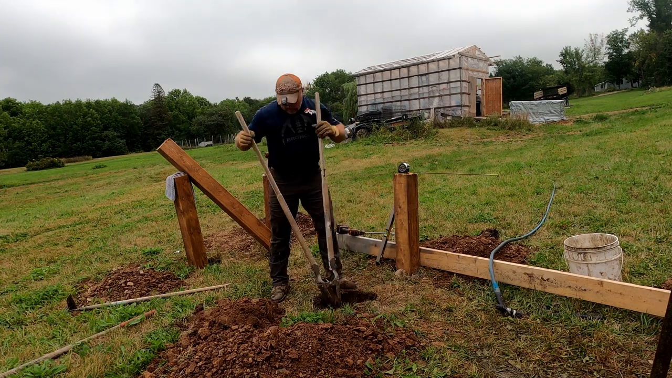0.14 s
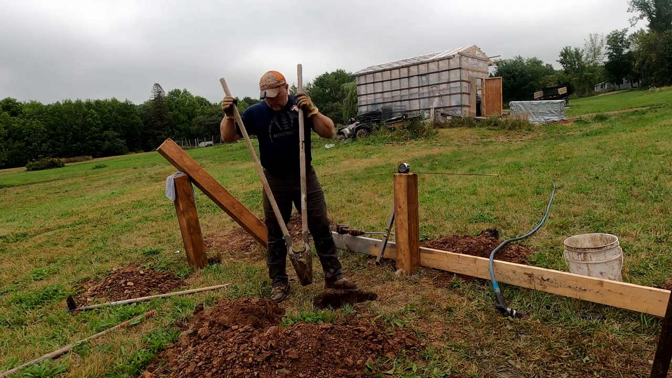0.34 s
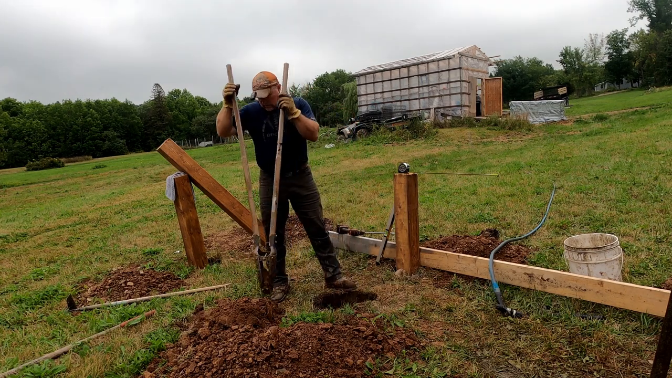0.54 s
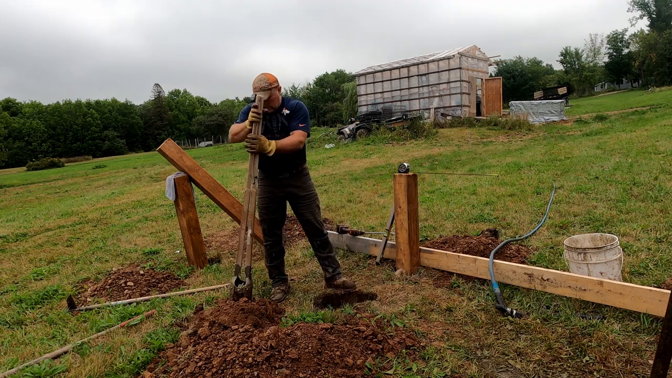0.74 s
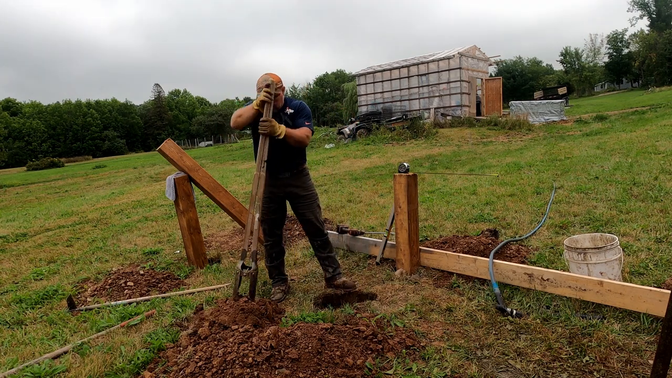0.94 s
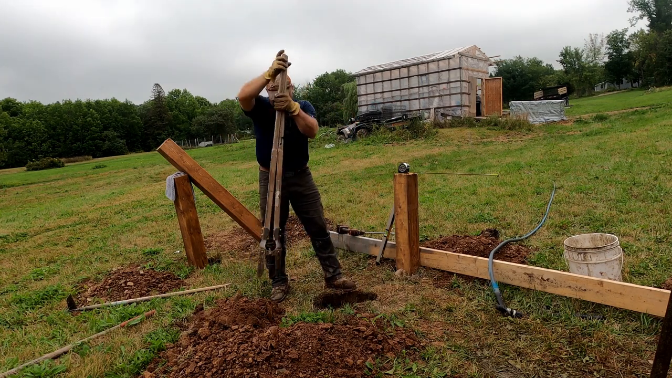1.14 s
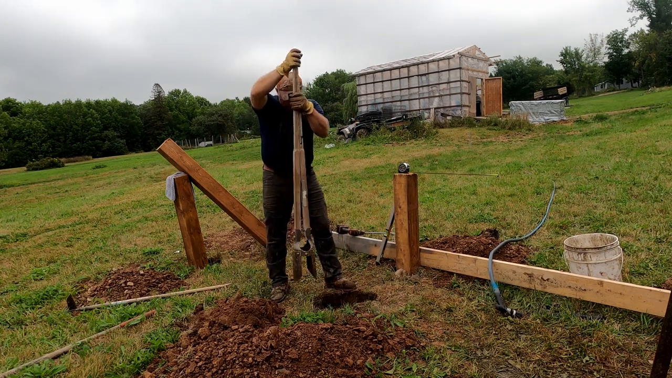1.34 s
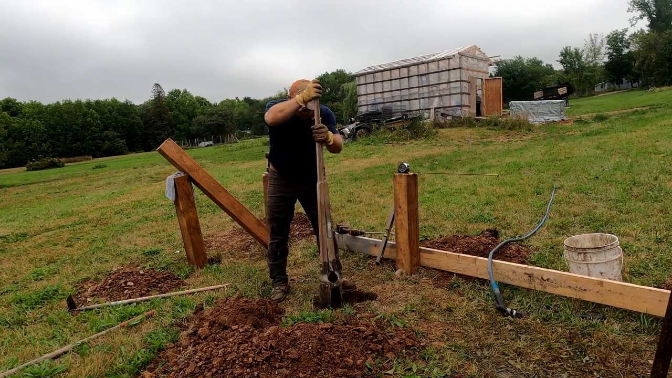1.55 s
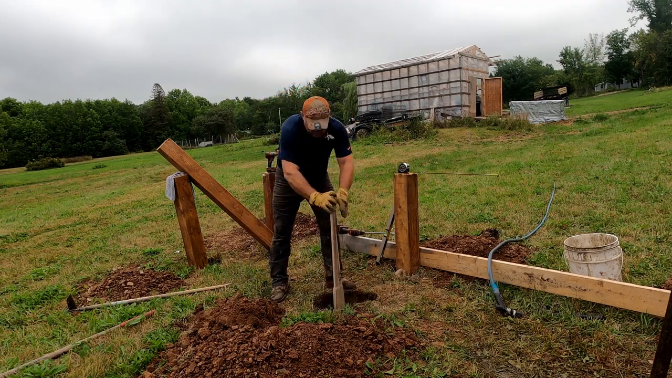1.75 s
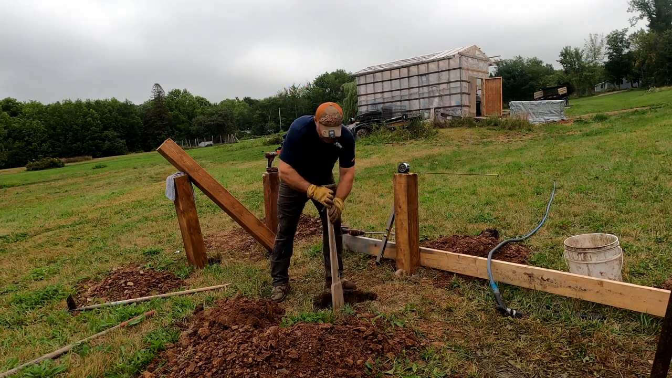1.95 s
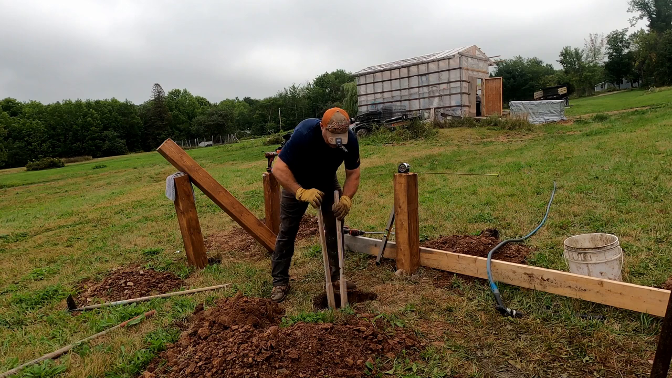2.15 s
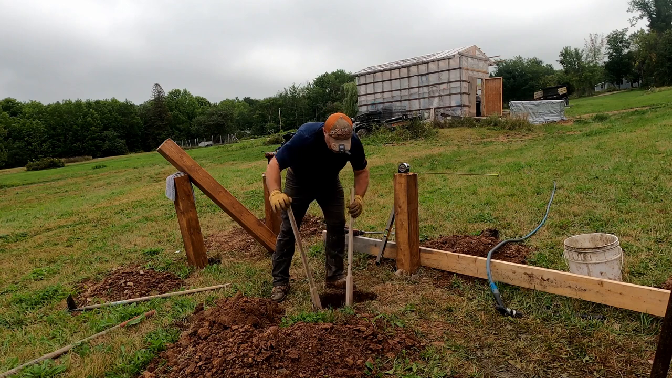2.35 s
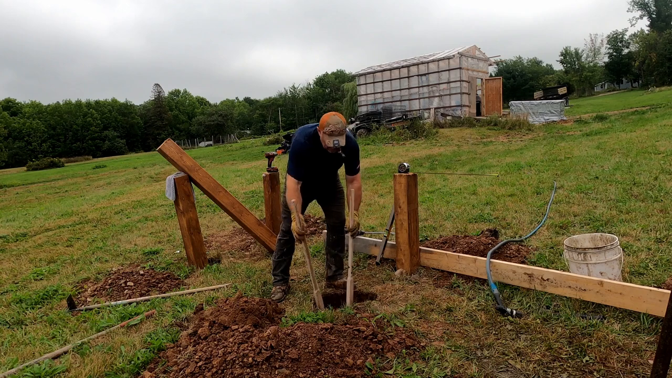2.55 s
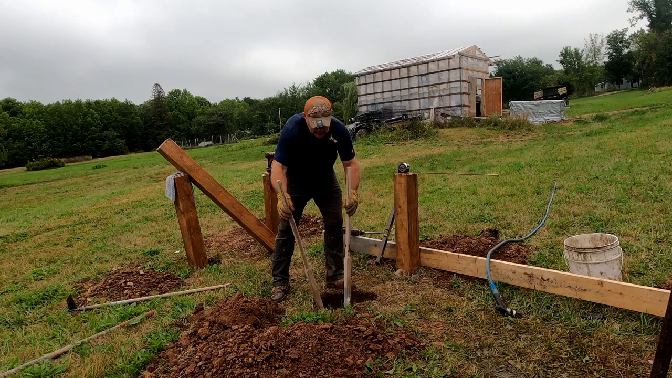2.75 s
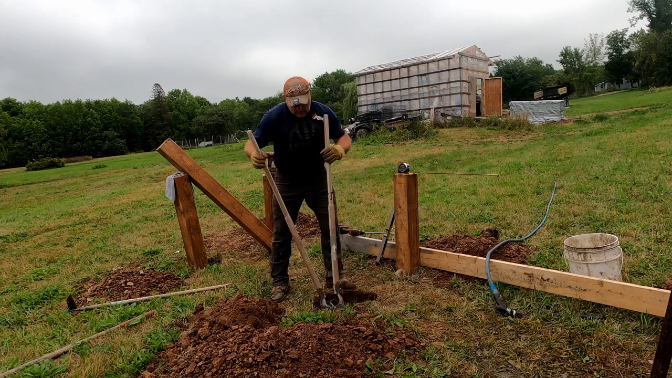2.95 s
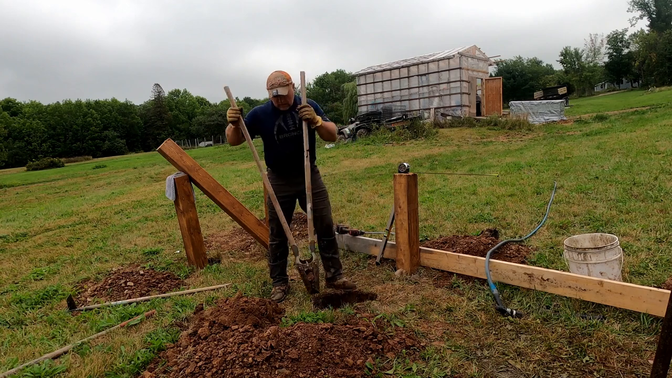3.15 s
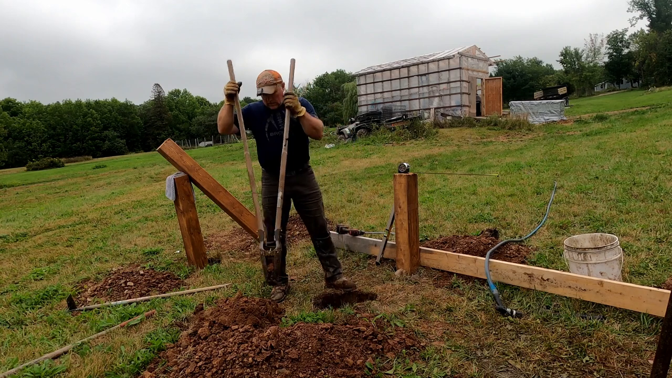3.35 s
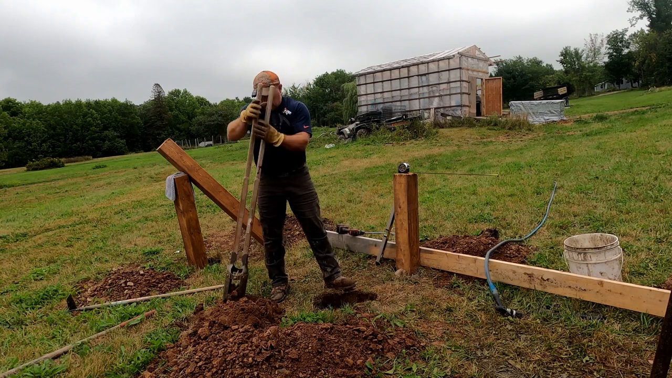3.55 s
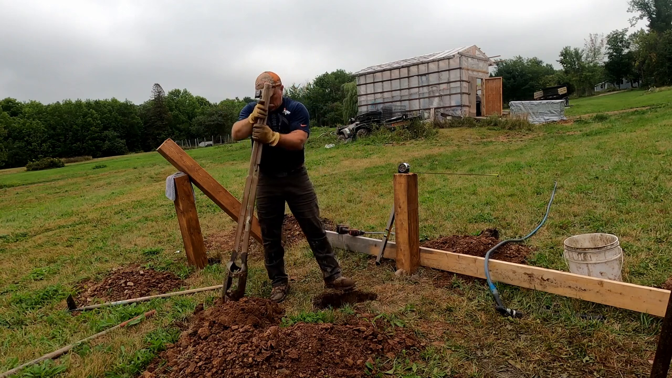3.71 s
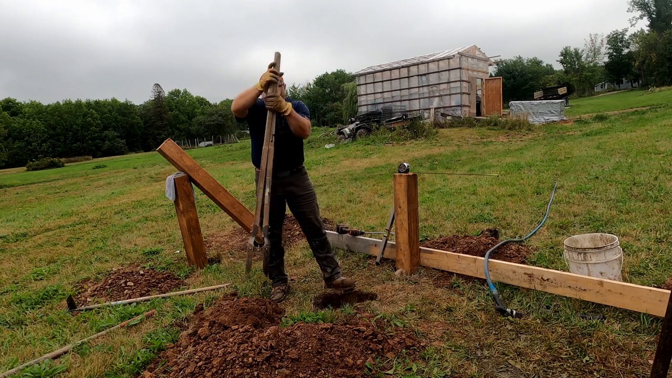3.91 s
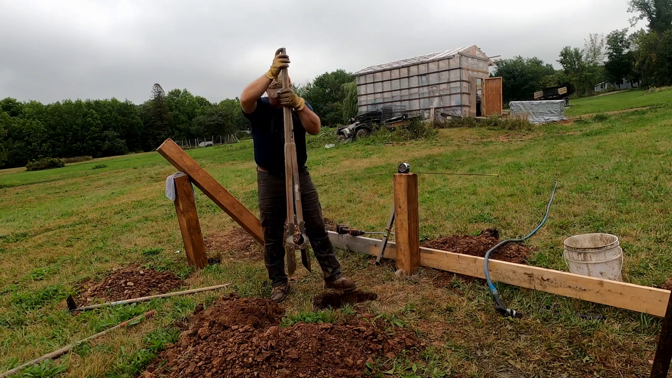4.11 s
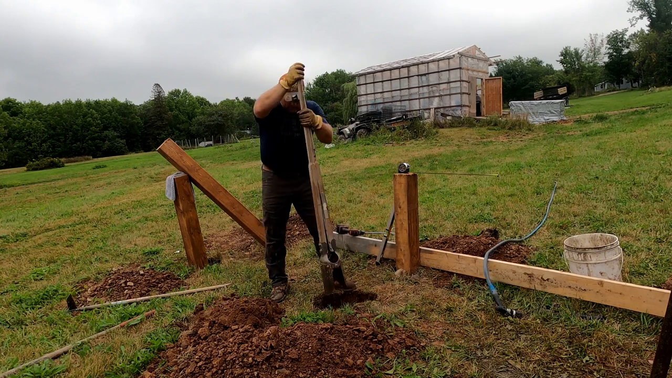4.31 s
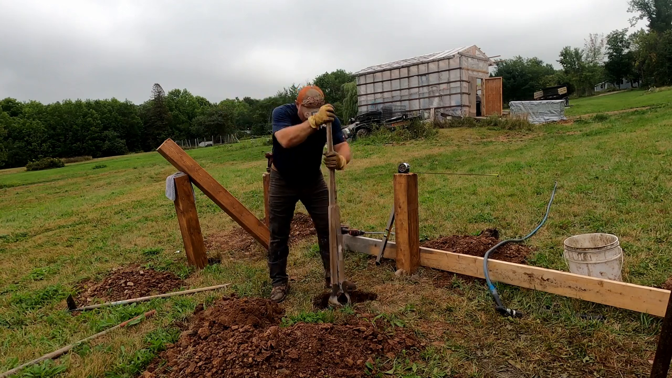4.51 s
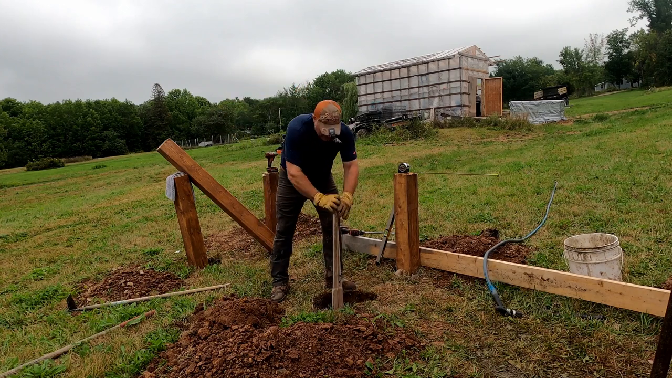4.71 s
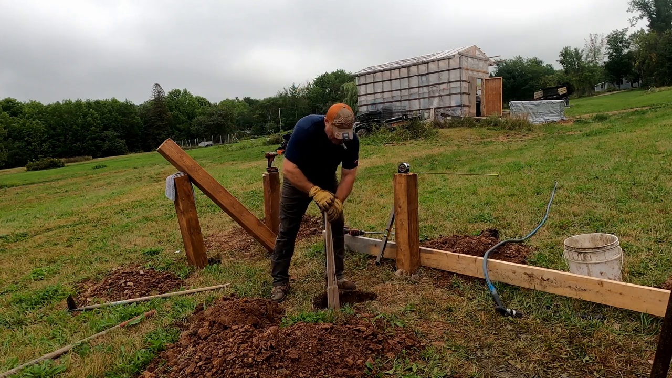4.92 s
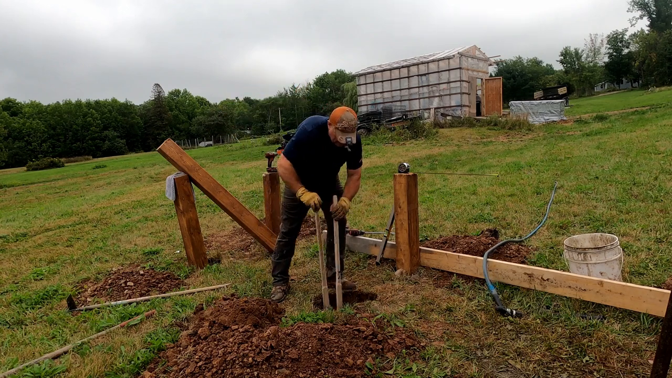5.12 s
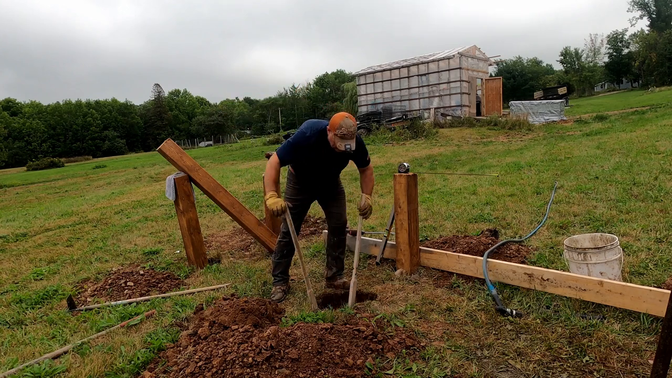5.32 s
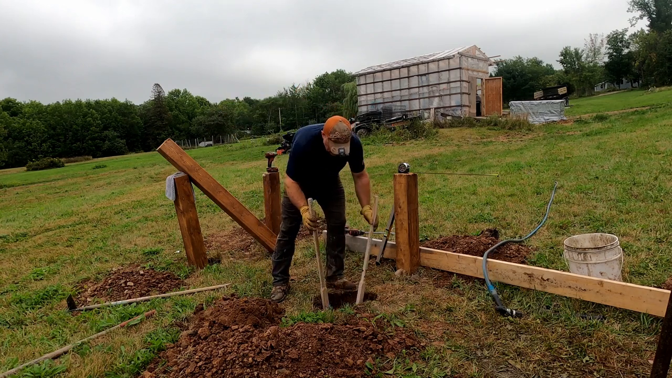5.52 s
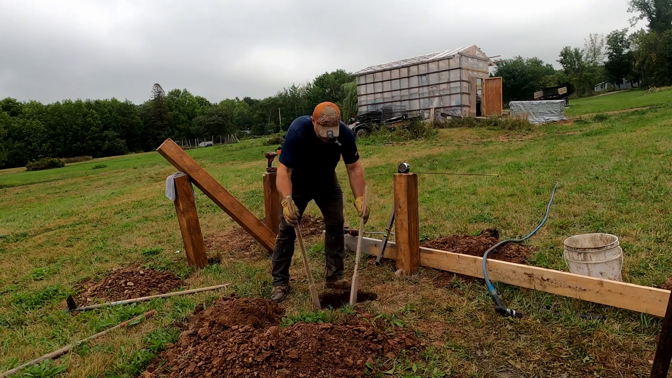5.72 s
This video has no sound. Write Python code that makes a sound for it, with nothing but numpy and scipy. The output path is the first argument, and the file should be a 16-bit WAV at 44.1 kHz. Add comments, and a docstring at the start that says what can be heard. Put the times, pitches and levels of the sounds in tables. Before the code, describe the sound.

Two rounds of digging with a post hole digger sound near the microphone outdoors. Each brings a soft gritty scrape, a loud metallic knock that shakes the load off, a trickle of crumbling earth, then a crunching, thudding stab into the ground. Wooden handles knock and creak lightly between blows, while quiet crickets and a low breeze carry on throughout.

```python
"""A meadow, where a clamshell digger works a post hole in stony clay. The blades scrape up the
wall, knock their load off, clack, ring, and plunge back with a crunch and a thud of the hole. The
handles knock and creak; loose soil trickles onto the heap. Crickets sing with wing strokes, mostly
on the left, over wind and far rumble. The hardest blows saturate."""
import sys
import numpy as np
from scipy import signal
from scipy.fft import rfft, irfft, next_fast_len
from scipy.io import wavfile
from scipy.ndimage import uniform_filter1d, map_coordinates

SR = 44100
rng = np.random.default_rng(int(sys.argv[2]) if len(sys.argv) > 2 else 0)


def wrap_up_sound(samples):
    """Save the sound to the file named by the first command line argument, as 16-bit audio."""
    columns = np.atleast_2d(samples).T
    # keep every value between -1 and 1, then stretch to whole-number steps
    tamed = np.clip(columns, -1, 1)
    steps = np.round(tamed * 32767).astype(np.int16)
    wavfile.write(sys.argv[1], SR, steps)


N = 254456

# Contacts with stone and clay: (time [s], level [dB], bass [rel dB], treble [rel dB], crush [ms])
CONTACTS = [(.397, -45, -22, -25, 11), (0.442, -43, -17, -27, 2.2), (.490, -56.5, -1, -31, 2.7),
            (.510, -49.5, -4.5, -38, 12), (.590, -41.5, 3, -37, 4.8), (0.804, -40.5, -13, -3.5, 18),
            (.862, -2.5, -21, -22, 2.2), (0.892, -13.5, -16, -23, 4.6), (0.92, -31, -4.5, -17, 9.1),
            (0.984, -34.5, -37, -30, 12), (1.05, -29.5, -19.5, -10, 5.7), (1.089, -18.5, -31, -4, 2),
            (1.593, -33, -24, -29, 14.4), (1.702, -32.5, -17, -9, 2), (1.714, -34.5, -25, -13, 5.6),
            (1.761, -39.5, -17.5, -17, 12.4), (1.848, -27.5, -19, -14, 5.5), (2.302, -51.5, 7.5, -9, 3.7),
            (2.319, -57, 13.5, -6, 4.2), (2.349, -45, -8, -23, 6.9), (2.491, -49.5, -13, -15, 4.3),
            (2.517, -56, 4, -40, 5.5), (3.122, -51, 2.5, -19, 3.3), (3.165, -45, 0, -17, 3.6),
            (3.644, -31.5, -9, -11, 4.4), (3.651, -25, -27, -12, 2.44), (3.684, -27, -7.5, -12, 21),
            (3.724, -2, -33, -19, 2.05), (3.814, -35, -22, -19, 5.5), (3.844, -33.5, -32, -37, 21.5),
            (4.411, -50, -15, -34, 10), (4.453, -46, -19, -35, 18), (4.495, -32.5, -28, -27, 10),
            (4.527, -42, -22, -41, 4.7), (4.665, -39.5, -23, -13, 7.2), (4.692, -36.5, -19.5, -26, 9.3),
            (4.726, -40, -19, -30, 16), (4.771, -39.5, -8, -33, 12), (4.787, -32, -12, 0.5, 6.1),
            (4.796, -41, -35, 4, 7.7), (5.272, -40.5, -10.5, -23, 8.7), (5.298, -38.5, -4, -45, 6.4),
            (5.34, -49.5, -1.5, -32, 15), (5.448, -53.5, -26, 2.5, 2.4), (5.493, -62, 4, -26, 6)]
# Blades sinking: (time [s], length [s], level [dB], bass [rel dB], 1-2 kHz [rel dB],
# 4-6 kHz [rel dB], treble [rel dB], clang [rel dB])
BLADE_PLUNGES = [(0.83, 0.047, -29.5, -11.5, -9.5, -3.5, -3.5, -11),
                 (1.864, 0.036, -12.5, -8, -4.5, -6, -19, -12), (3.664, 0.1, -37.5, -3, 0.5, -3, -7, 4),
                 (3.73, 0.027, -38, 0.5, -13, -25, -6, -18), (4.795, 0.028, -22, -1, -2, 1.5, -17, 4)]
# Crushed clay: (frequency [Hz], density [rel dB])
CLAY_SPECTRUM = [(150, -29.5), (250, -13), (388, -18.5), (670, -11.5), (936, -11.5), (1200, -5.5),
                 (1380, -9.5), (1590, -4), (3100, -2), (4650, -4.5), (7220, -16), (9240, -12), (16800, -39)]
# Blades damped by hand and clay: (frequency [Hz], width [Hz], level [rel dB])
DAMPED_MODES = [(1633, 78, -6.5), (2092, 48, -0.5), (2620, 120, -7), (2820, 73, -5), (3293, 150, -0.5),
                (3620, 77, -1), (3800, 33, -6.5), (4450, 210, -7), (4630, 40, -17)]
CONTACT_TAIL_MS, CLANG_DB = 53.6, -7


def digger():
    """Each contact crushes clay, dies away treble first and clangs in the damped blades."""
    band_envs, push, t = np.zeros((5, N)), np.zeros(N), np.arange(SR // 4) / SR
    contacts = [(*row, CONTACT_TAIL_MS) for row in CONTACTS] + wall_slips()
    for s, db, bass_db, treble_db, crush_ms, tail_ms in contacts:
        t60_ms = tail_ms + 1.8 * crush_ms
        decay_db = 60 * np.maximum(t * 1000 - crush_ms, 0) / t60_ms
        attack = 1 - np.exp(-t * 1000 / (0.14 * crush_ms))
        colour_db = np.array([[bass_db], [2 + 0.59 * bass_db], [0], [.43 * treble_db], [treble_db]])
        add(band_envs, s, amp(db + colour_db - decay_db * [[.8], [.9], [1], [1.2], [1.5]]) * attack)
        clang_db = CLANG_DB - 0.18 * bass_db  # dull blows clang less
        add(push, s, amp(db + clang_db - 2.2 * decay_db) * attack)
    for s, length_s, db, bass_db, body_db, edge_db, treble_db, clang_db in BLADE_PLUNGES:
        gate = np.clip(t / 0.0027, 0, 1) * amp(-np.maximum(t - length_s, 0) * 1180)
        colour_db = np.array([[bass_db], [body_db], [0], [edge_db], [treble_db]])
        add(band_envs, s, amp(db + colour_db) * gate)
        add(push, s, amp(db + clang_db) * gate)
    clay = five_bands(grains(CLAY_SPECTRUM, per_s=3000, spread_db=2.5, bed=0.74))
    crunch = sum(env * band for env, band in zip(band_envs, clay))

    def blades(hz):
        return sum((-1) ** k * amp(db) * 1j * hz * width / (mode ** 2 - hz ** 2 + 1j * hz * width)
                   for k, (mode, width, db) in enumerate(DAMPED_MODES))

    shake = rng.standard_normal((2, N)) * [[1], [.4]]
    clang = filtered(push * shake, blades) / np.std(filtered(shake, blades))
    return crunch * [[1], [.6]] + clang


# Closed blades dragged up the wall: (start [s], end [s], slip level [dB])
BLADE_LIFTS = [(.13, .56, -46.5), (3.05, 3.44, -43.5)]
SLIP_GAP_S, SLIP_SCATTER_DB = 1 / 60, 5.5
SLIP_SHAPE = (-7.5, -14.5, 0.6, 11)  # (bass [rel dB], treble [rel dB], crush [ms], tail [ms])


def wall_slips():
    """The blades stick and slip on the wall: rows of small contacts at uneven times."""
    rows, draw = [], rng.random((40, 2, 2))
    for k, (start_s, end_s, db) in enumerate(BLADE_LIFTS):
        times_s = start_s + np.cumsum(.3 + 1.5 * draw[:, k, 0]) * SLIP_GAP_S
        levels_db = db + SLIP_SCATTER_DB * (2 * draw[:, k, 1] - 1)
        rows += [(s, slip_db, *SLIP_SHAPE) for s, slip_db in zip(times_s, levels_db) if s < end_s]
    return rows


# Thuds of the hole: (time [s], frequency [Hz], level [dB], t60 [s], rise [ms])
HOLE_THUDS = [(0.865, 149, -22.5, 0.13, 3.6), (1.889, 102.4, -2, 0.078, 7.7),
              (2.337, 169, -29.5, 0.073, 7.2), (3.73, 74.3, -32.5, .1, 1.8), (4.813, 437, -5, 0.053, 6.5),
              (4.829, 162.5, 10.5, 0.038, 7.3), (4.848, 106, -14.5, 0.086, 2.4),
              (4.891, 79.4, -23.5, 0.046, 2.5), (5.405, 96, -33, 0.1, 5.9)]


def hole_thuds():
    """The air and walls of the hole answer with a low, short swing."""
    out, t = np.zeros(N), np.arange(SR // 4) / SR
    for s, hz, db, t60_s, rise_ms in HOLE_THUDS:
        attack = (1 - np.exp(-t * 1000 / rise_ms)) ** 2
        add(out, s, amp(db - 60 * t / t60_s) * attack * np.sin(2 * np.pi * hz * t))
    return out * amp([[1.2], [-1.2]])


# Free steel blades: (frequency [Hz], level [rel dB], t60 [s])
STEEL_MODES = [(3310, -2.5, 0.46), (4020, -23, .3), (4950, -7, 0.11), (5600, -23, 0.16),
               (6500, -23.5, 0.099), (7343, -23.5, .06), (8312, -20.5, .06), (8600, -17, .06),
               (9100, -26, .07), (10510, -35, .1), (11800, -30, .09), (13050, -28.5, .09)]
# Blows that leave them ringing: (time [s], level [dB], share of t60 [ratio])
RINGING_BLOWS = [(0.896, -27.5, 0.86), (1.053, -31, 0.73), (1.090, -15, 0.99), (1.597, -29, 0.37),
                 (1.703, -40, 0.094), (4.497, -16, 0.12), (5.3, -45, .12)]


def blade_ring():
    """Struck steel rings on its free modes."""
    out, t = np.zeros(N), np.arange(SR // 2) / SR
    for s, db, share in RINGING_BLOWS:
        steel = sum(amp(mode_db - 60 * t / (t60_s * share)) * np.sin(2 * np.pi * hz * t)
                    for hz, mode_db, t60_s in STEEL_MODES)
        add(out, s, amp(db) * steel * (1 - np.exp(-t / 0.0056)))
    return out * [[1], [.3]]


# Wooden handles: (frequency [Hz], level [rel dB], t60 [s])
WOOD_MODES = [(633, -9, 0.032), (899, -9, 0.085), (1200, 3, 0.033), (2007, -17, 0.046)]
# Knocks on them: (time [s], level [dB], tilt [dB/octave])
HANDLE_KNOCKS = [(0.590, -25, -10), (1.596, -34, 25), (2.321, -43, 5.5), (2.515, -36.5, 1),
                 (3.087, -33, -4), (4.497, -37.5, 27), (4.891, -43.5, -30), (5.277, -33, -10),
                 (5.304, -39, -10), (5.495, -35.5, 1)]


def handle_knocks():
    """Wood rings briefly, its modes varying in level and pitch with each knock."""
    out, t = np.zeros(N), np.arange(SR // 2) / SR
    attack = 1 - np.exp(-t / 0.0034)
    for s, db, tilt_db in HANDLE_KNOCKS:
        for hz, mode_db, t60_s in WOOD_MODES:
            start_db = db + mode_db + tilt_db * np.log2(hz / 1000) + rng.normal(0, 4.4)
            tone = np.sin(2 * np.pi * hz * rng.normal(1, 0.033) * t)
            add(out, s, amp(start_db - 60 * t / t60_s) * attack * tone)
    return out * [[1], [.3]]


# Handle creaks and bright blade clacks: (middle [s], length [s], frequency [Hz], level [dB])
CREAKS_AND_CLACKS = [(0.184, 0.069, 1252, -41), (1.719, 0.057, 3540, -29), (2.661, 0.044, 1700, -43),
                     (2.69, 0.045, 3300, -58), (3.45, 0.11, 1300, -35), (3.392, 0.044, 1610, -50),
                     (5.24, 0.18, 541, -45.5), (5.284, 0.022, 2740, -28)]


def creaks_and_clacks():
    """Handles creak and blades clack: short resonant tones that swell and waver in pitch."""
    out = np.zeros(N)
    for s, length_s, hz, db in CREAKS_AND_CLACKS:
        waver = uniform_filter1d(rng.standard_normal(int(length_s * SR)), size=150)
        tone = stroke(lambda u: hz * (1 + 0.73 * waver), length_s)
        add(out, s - length_s / 2, amp(db) * np.hanning(len(waver)) * tone)
    return out * [[1], [.3]]


# Moving soil: (time [s], crumb level [dB], grit level [dB])
SOIL_FLOW = [(0.0, -54.5, -70), (0.18, -46.5, -58), (0.32, -45.5, -45), (0.5, -46, -70), (0.68, -55, -56),
             (0.96, -56, -40.5), (1.04, -42.5, -32.5), (1.25, -72.5, -64.5), (1.7, -52, -70),
             (2.04, -53, -45.5), (2.14, -68.5, -57.5), (2.34, -48, -77.5), (2.54, -60, -64),
             (2.71, -50, -51), (2.95, -55, -87), (3.28, -40.5, -44.5), (3.47, -44.5, -54),
             (3.68, -63, -52.5), (3.9, -62.5, -35.5), (4.4, -64.5, -68), (4.82, -50, -43.5),
             (4.96, -66.5, -54.5), (5.3, -48, -70), (5.77, -58, -54.5)]
# Loads landing on the heap: (time [s], level [dB], rise [ms], t60 [s])
SOIL_FALLS = [(0.975, -27.5, 27, 0.5), (1.04, -37, 17, 0.64), (3.835, -27.5, 15, 0.35)]
# Dull crumbs: (frequency [Hz], density [rel dB])
CRUMB_SPECTRUM = [(120, -41.5), (200, -31), (309, 0.5), (647, -14), (775, -0.5), (849, -7.5), (998, -1.5),
                  (2850, 3), (8410, -20.5), (12300, -40), (15000, -66)]
# Fine grit: (frequency [Hz], density [rel dB])
GRIT_SPECTRUM = [(600, -41), (1200, -13.5), (2000, -7.5), (3000, 0), (4000, -2), (5500, -14.5),
                 (9000, -29.5), (15000, -72)]


def loose_soil():
    """Crumbs rub on the blades and grit rains on the heap, both in clumps."""
    crumb_db, grit_db = curves(SOIL_FLOW)
    bands = five_bands(grains(CRUMB_SPECTRUM, per_s=2500, spread_db=1.5, bed=1.15))
    rub = sum(amp(db) * band for db, band in zip((-11.5, -2, -18, -12.5, -19.5), bands))
    stones = pebbles(per_s=900, middle_hz=2100, spread=.4, decay_cycles=2.5)
    crumbs = amp(crumb_db + 0.63 * wobble(30)) * (rub + amp(-4.5) * stones)
    flow, t = amp(grit_db), np.arange(SR // 2) / SR
    for s, db, rise_ms, t60_s in SOIL_FALLS:
        add(flow, s, amp(db - 60 * t / t60_s) * (1 - np.exp(-t * 1000 / rise_ms)))
    grit = amp(-3) * grains(GRIT_SPECTRUM, per_s=4400, spread_db=0.5, bed=0.97)
    grit += amp(-10) * pebbles(per_s=1600, middle_hz=3032, spread=.5, decay_cycles=14)
    dust_spectrum = [(5000, -30), (8000, -2.5), (11000, -10), (14500, -11), (16000, -42)]
    dust = grains(dust_spectrum, per_s=2500, spread_db=2.2, bed=.9)
    dust *= amp(-31) * flow + amp(crumb_db - 25)
    return crumbs + amp(0.33 * wobble(48)) * flow * grit + dust


def pebbles(per_s, middle_hz, spread, decay_cycles):
    """Small stones tick together: damped sines of scattered pitch and size on two unrelated tracks."""
    draw, k = rng.random((int(per_s * N / SR), 5)), np.arange(400)
    hz = middle_hz * np.exp(spread * 3 * (draw[:, 1:3].mean(1, keepdims=True) - .5))
    size = amp(20 * draw[:, 3:4] ** 3)
    decay = np.exp(-k * hz / SR / decay_cycles) * signal.windows.tukey(400, .15)
    ticks = size * decay * np.sin(2 * np.pi * hz * k / SR)
    track, span = draw[:, 4:] < .5, N + 400
    index = (draw[:, :1] * N).astype(int) + k + span * track
    pair = np.bincount(index.ravel(), ticks.ravel(), 2 * span).reshape(2, -1)
    return unit_rms(pair[:, :N] * [[1], [.5]])


# Field cricket: (time of second stroke [s], level [dB])
FIELD_CHIRPS = [(.19, -45.5), (.571, -44), (.968, -44), (1.316, -47), (1.690, -45.5), (2.03, -56),
                (2.396, -46.5), (2.780, -46), (3.202, -44.5), (3.557, -45.5), (3.927, -56), (4.320, -49),
                (4.728, -43), (5.134, -45.5), (5.482, -46.5)]


def field_cricket():
    """Three wing strokes make a chirp, each falling in pitch."""
    out = np.zeros((2, N))
    for s, db in FIELD_CHIRPS:
        for offset_s, length_s, stroke_db in ((-.036, .019, -3), (0, .023, 0), (.039, .022, 0)):
            gain = amp(db + stroke_db + rng.normal(0, 1)) * amp([[3], [-10.5]])
            add(out, s + offset_s, gain * stroke(lambda u: 5080 - 480 * u ** 1.64, length_s))
    return out


# Ground cricket, falling pitch: (time [s], strokes so far [count])
FALLING_STROKES = [(.060, 0), (1.455, 22), (2.916, 45), (4.306, 67), (5.758, 90)]
# Ground cricket, arching pitch: (time [s], strokes so far [count])
ARCHING_STROKES = [(.027, 0), (1.297, 20), (1.424, 22), (2.39, 37), (3.0, 46), (3.52, 54), (5.371, 83),
                   (5.744, 89)]


def ground_crickets():
    """Two singers keep up steady trains of wing strokes."""
    out = np.zeros((2, N))
    for table, db, pitch_hz in ((FALLING_STROKES, -67, lambda u: 7400 - 300 * u * u),
                                (ARCHING_STROKES, -70, lambda u: 8000 - 2400 * (u - .45) ** 2)):
        times_s, count = np.transpose(table)
        for s in np.interp(np.arange(count[-1]), count, times_s):
            gain = amp(db + rng.normal(0, 1.6)) * amp([[3.5], [-5.5]])
            add(out, s, gain * stroke(pitch_hz, 0.019))
    return out


# Bush crickets: (middle [s], frequency [Hz])
BUSH_BUZZES = [(.224, 8150), (.511, 8150), (1.213, 8150), (1.504, 8150), (1.79, 8150), (2.065, 8150),
               (2.336, 8150), (2.625, 8150), (3.221, 8150), (3.553, 8150), (4.143, 8150), (4.429, 8150),
               (4.72, 8150), (5.024, 8150), (5.277, 8150), (5.523, 8150), (5.75, 8150), (.055, 8600),
               (.608, 8600), (1.41, 8600), (2.24, 8600), (2.903, 8600), (5.085, 8600), (5.42, 8600),
               (5.692, 8600)]
BUZZ_STROKES_PER_S = 122


def bush_crickets():
    """Six quick wing strokes make a buzz; the lower singer is nearer and further left."""
    out = np.zeros((2, N))
    for s, hz in BUSH_BUZZES:
        db, pan_db = (-58, 3.3) if hz < 8400 else (-64.5, .1)
        for k in range(-3, 3):
            gain = amp(db + rng.normal(0, 1.9)) * amp([[pan_db], [-pan_db]])
            add(out, s + k / BUZZ_STROKES_PER_S, gain * stroke(lambda u: hz + 250 - 500 * u, 0.0059))
    return out


# Meadow air: (frequency [Hz], density [rel dB])
AIR_SPECTRUM = [(12, -17.5), (20, -10.5), (52, -1), (130, -4.5), (180, 0.5), (341, -12), (471, -13),
                (553, -19), (944, -20.5), (1450, -16.5), (4340, -23.5), (4960, -15.5), (6480, -30),
                (8250, -19), (12000, -62), (15600, -85.5), (22000, -120)]
# Its width: (frequency [Hz], left-right correlation [ratio])
AIR_CORRELATION = [(60, 0.96), (180, 0.46), (550, 0.089), (1650, 0.44), (4970, -0.16), (15000, -0.7)]
# Its balance: (frequency [Hz], left minus right [dB])
AIR_BALANCE = [(60, 2.5), (150, 1.5), (380, -9), (950, -2), (2380, 5.5), (5980, 7), (15000, -8.5)]
# Wind rumble: (time [s], level [dB])
WIND_GUSTS = [(0.0, -56.5), (0.79, -55.5), (1.3, -58.5), (2.9, -59), (3.25, -51), (3.55, -57),
              (4.08, -59.5), (4.64, -58.5), (5.0, -55.5), (5.48, -57.5), (5.77, -55.5)]
AIR_DB, RUMBLE_HZ = -49.5, 350


def meadow_air():
    """Far hiss and rumble, the bass swelling with the wind."""
    def mid_side(hz):
        angle = np.arccos(np.clip(log_interp(AIR_CORRELATION, hz), -1, 1)) / 2
        return amp(log_interp(AIR_SPECTRUM, hz)) * [np.cos(angle), np.sin(angle)]

    mid, side = filtered(rng.standard_normal((2, N)), mid_side)
    balance = lambda hz: amp(log_interp(AIR_BALANCE, hz) * [[.5], [-.5]])
    air = filtered(np.array([mid + side, mid - side]), balance)
    bass = filtered(air, lambda hz: 1 / (1 + (hz / RUMBLE_HZ) ** 4))
    hiss = (air - bass) / np.std(air) * amp(AIR_DB + 0.27 * wobble(2.2))
    rumble = unit_rms(bass) * amp(curves(WIND_GUSTS)[0] + 2.8 * wobble(9))
    return hiss + rumble


# Arrival from the hole: (frequency [Hz], left phase lag [rad])
LEFT_LAG = [(60, .1), (250, .5), (1000, 0.45), (2000, 0.58), (4000, 1.15), (8000, 1.27), (12000, 0.94)]


def place_near(pair):
    """Direct and scattered sound to stereo: the left lags, and the treble spreads wider."""
    angle = lambda hz: np.arctan(log_interp([(200, 0.12), (2000, 0.37), (10000, 0.43)], hz))
    mid, side = filtered(pair, lambda hz: np.array([np.cos(angle(hz)), np.sin(angle(hz))]))
    lag = lambda hz: np.exp(np.array([[-.5j], [.5j]]) * log_interp(LEFT_LAG, hz))
    return filtered(np.array([mid + side, mid - side]), lag) * amp([[.45], [-.45]])


def grains(spectrum, per_s, spread_db, bed):
    """Random snaps of unequal size on a noise bed: two unrelated tracks of one colour."""
    hits = rng.random((2, N)) < per_s / SR
    snaps = hits * amp(spread_db * rng.exponential(size=(2, N))) * rng.standard_normal((2, N))
    burst = rng.standard_normal(96) * amp(-np.arange(96) * 0.45)  # about 2 ms
    rough = unit_rms(signal.lfilter(burst, 1, snaps)) + bed * rng.standard_normal((2, N))
    return unit_rms(filtered(rough, lambda hz: amp(log_interp(spectrum, hz))))


def stroke(pitch_hz, length_s):
    """One short tone following pitch_hz(u), u from 0 to 1."""
    u = np.arange(int(length_s * SR)) / (length_s * SR)
    phase = 2 * np.pi * np.cumsum(pitch_hz(u)) / SR + rng.uniform(0, 6)
    return np.sin(np.pi * u) ** .6 * np.sin(phase)


def five_bands(x):
    """Bass, body, mid, edge and treble, each of rms 1."""
    def bandpasses(hz):
        lowpasses = [1 / (1 + (hz / edge_hz) ** 6) for edge_hz in (870, 2080, 4310, 6200)]
        return np.diff(lowpasses, axis=0, prepend=0, append=1)[:, None]

    return [unit_rms(band) for band in filtered(x[None], bandpasses)]


def amp(db):
    return 10 ** (np.asarray(db) / 20)


def unit_rms(x):
    return x / np.sqrt(np.mean(x ** 2) + 1e-20)


def log_interp(points, hz):
    knots_hz, values = np.transpose(points)
    return np.interp(np.log(hz + 1), np.log(knots_hz + 1), values)


def curves(rows):
    """One value per sample for each column after the time."""
    times_s, *columns = np.transpose(rows)
    return [np.interp(np.arange(N) / SR, times_s, column) for column in columns]


def wobble(knots_per_s):
    """A smooth random curve."""
    knots = rng.standard_normal(int(N * knots_per_s / SR) + 4)
    return map_coordinates(knots, [np.arange(N) * knots_per_s / SR])


def filtered(x, response):
    size = next_fast_len(N + 8192)
    return irfft(rfft(x, size) * response(np.fft.rfftfreq(size, 1 / SR)), size)[..., :N]


def add(track, start_s, sound):
    start = round(start_s * SR)
    part = track[..., start:start + sound.shape[-1]]
    part += sound[..., :part.shape[-1]]


def scene():
    """The digger and its soil stand near; insects and wind surround them."""
    near = place_near(digger() + blade_ring() + handle_knocks() + creaks_and_clacks() + loose_soil())
    return near + hole_thuds() + field_cricket() + ground_crickets() + bush_crickets() + meadow_air()


ROLLOFF_HZ, BAND_LIMIT_HZ = 15000, 16500


def record(dry):
    """Peaks saturate at full scale; the top treble is dulled, then cut off."""
    saturated = dry / (1 + np.abs(dry) ** 8) ** (1 / 8)
    lowpass = lambda hz: (hz < BAND_LIMIT_HZ) / (1 + (hz / ROLLOFF_HZ) ** 6)
    return np.clip(filtered(saturated, lowpass), -1, 1)


dry = scene()
out = record(dry)
wrap_up_sound(out)
```